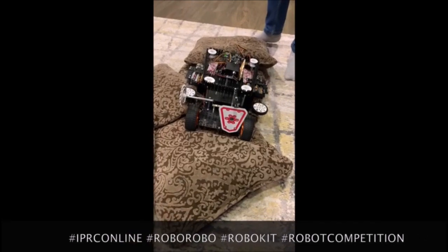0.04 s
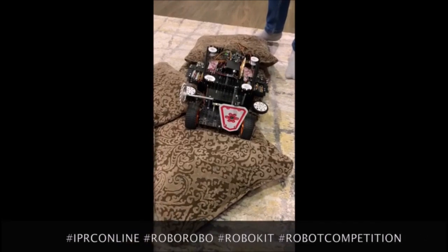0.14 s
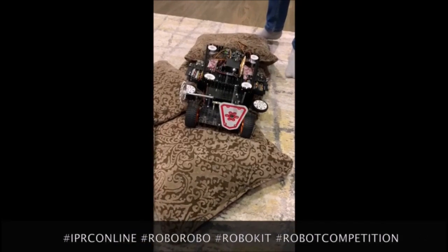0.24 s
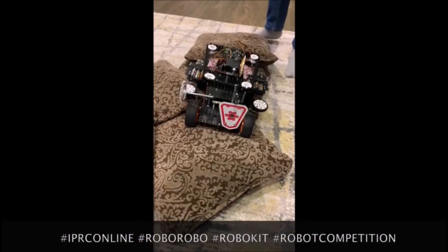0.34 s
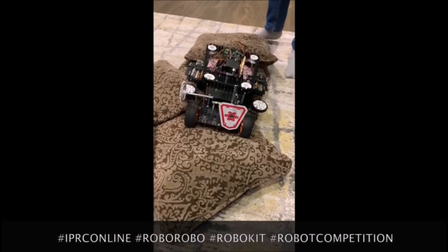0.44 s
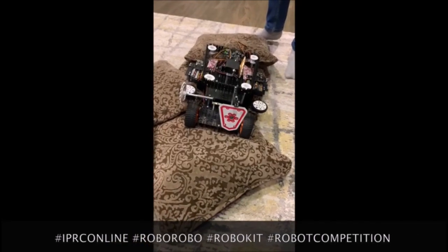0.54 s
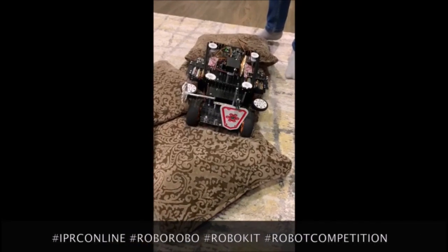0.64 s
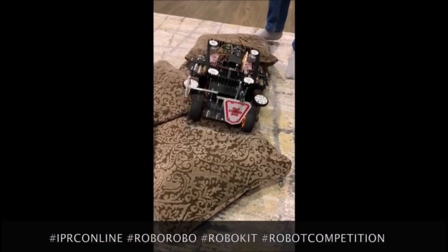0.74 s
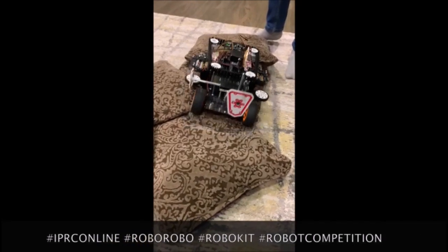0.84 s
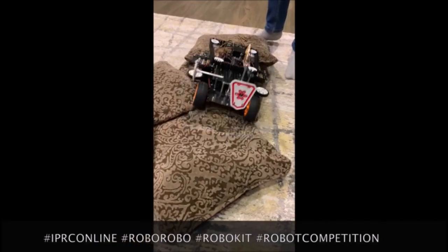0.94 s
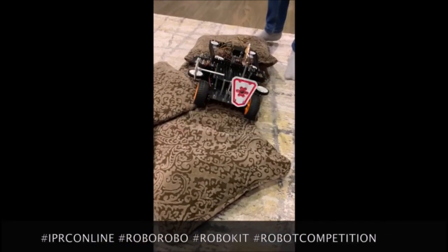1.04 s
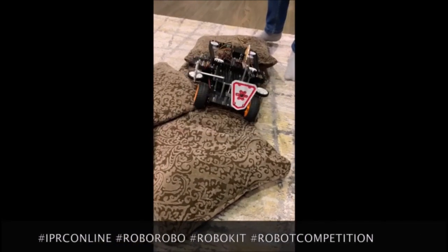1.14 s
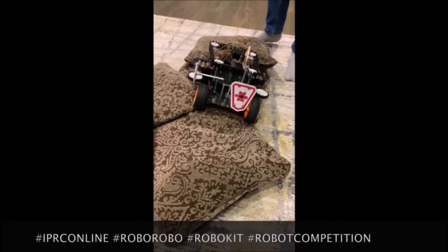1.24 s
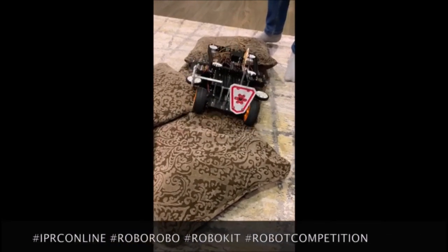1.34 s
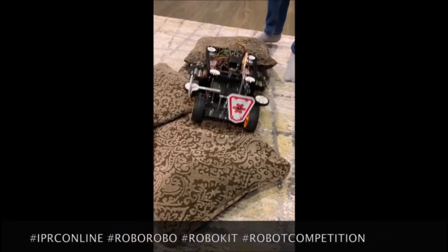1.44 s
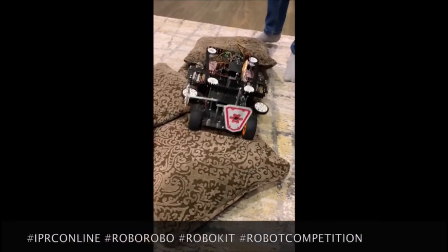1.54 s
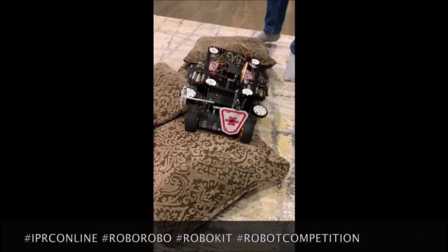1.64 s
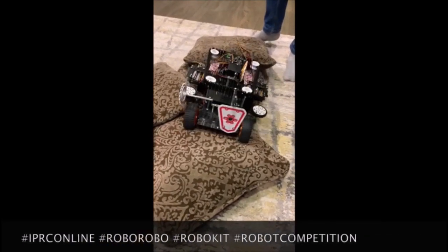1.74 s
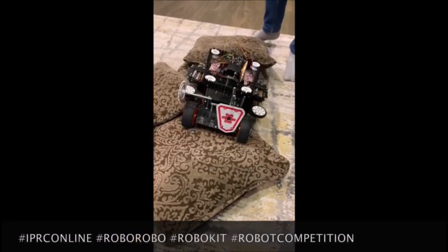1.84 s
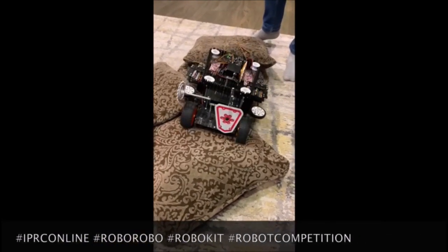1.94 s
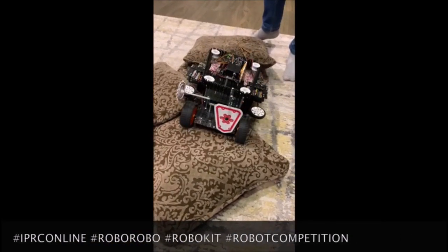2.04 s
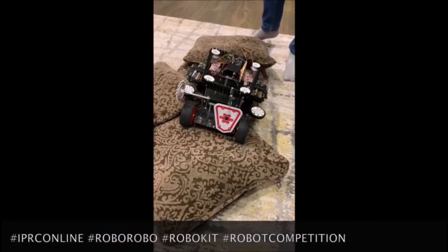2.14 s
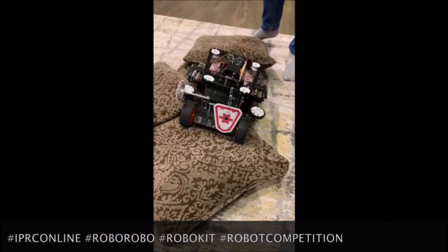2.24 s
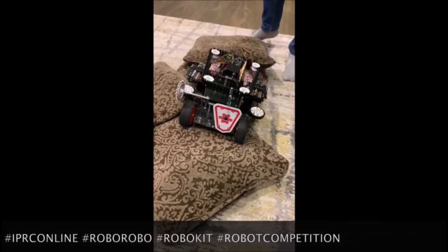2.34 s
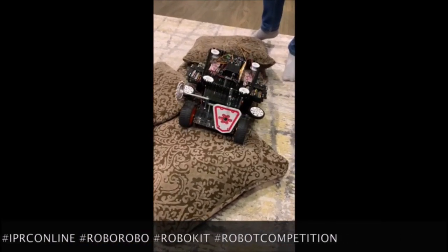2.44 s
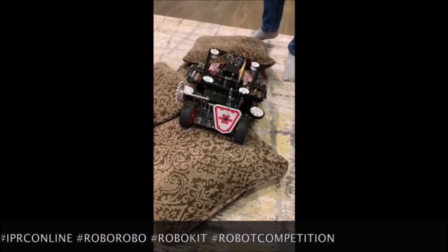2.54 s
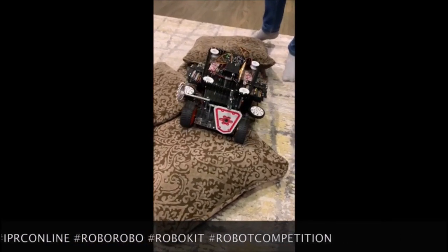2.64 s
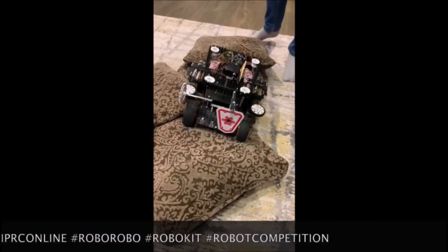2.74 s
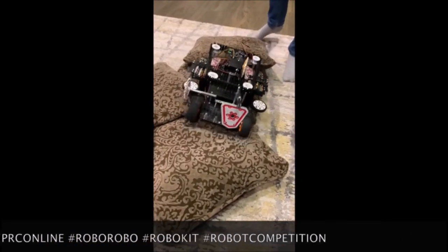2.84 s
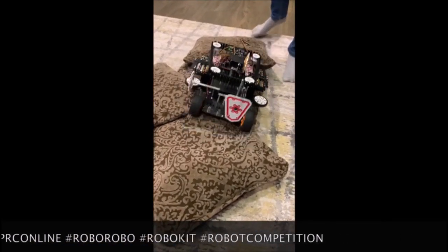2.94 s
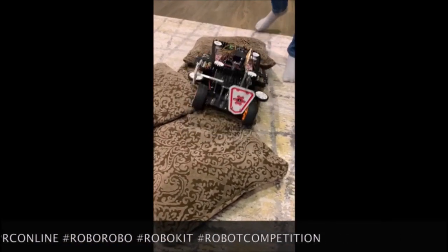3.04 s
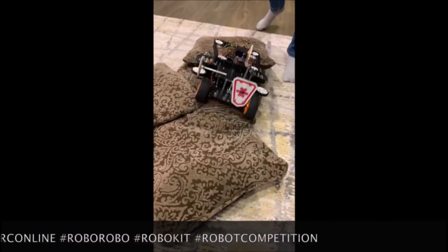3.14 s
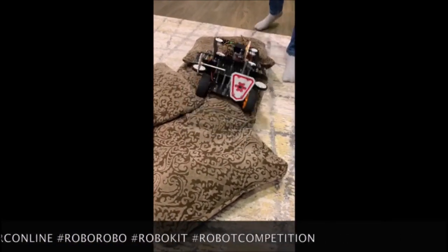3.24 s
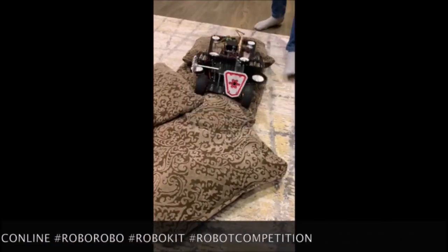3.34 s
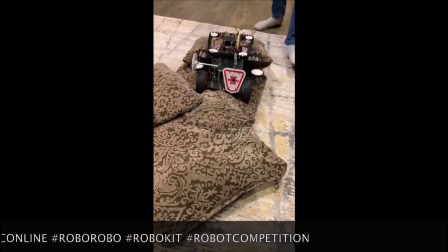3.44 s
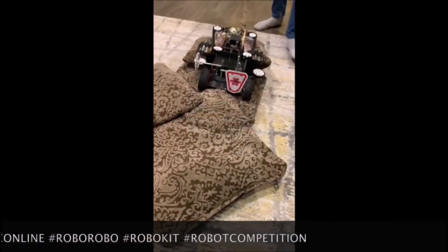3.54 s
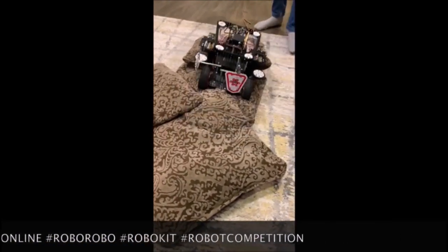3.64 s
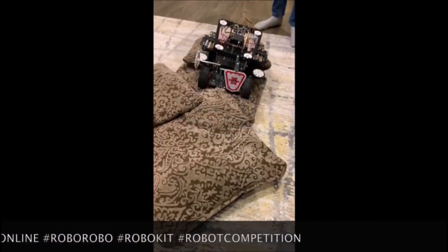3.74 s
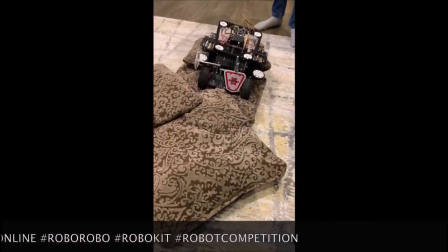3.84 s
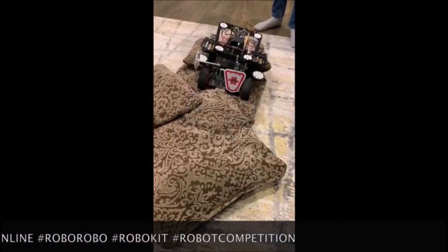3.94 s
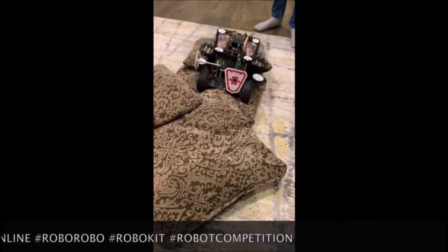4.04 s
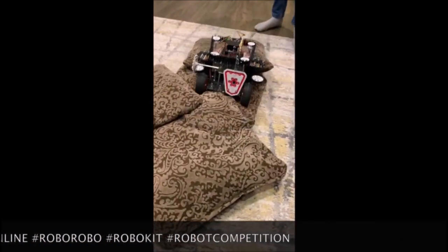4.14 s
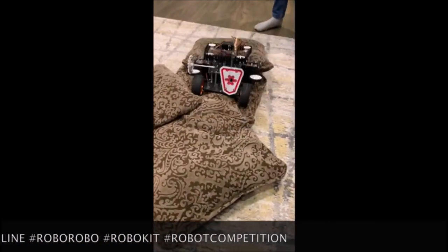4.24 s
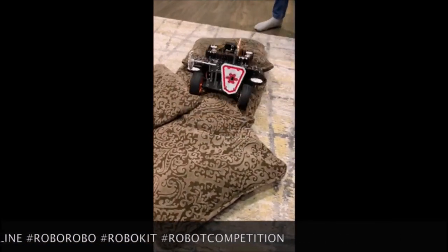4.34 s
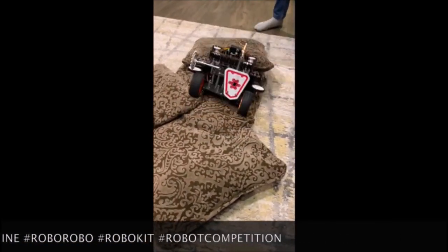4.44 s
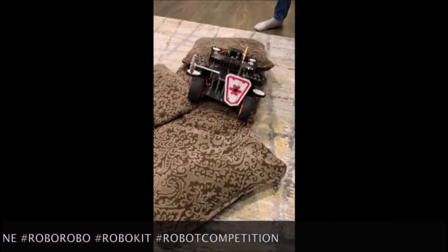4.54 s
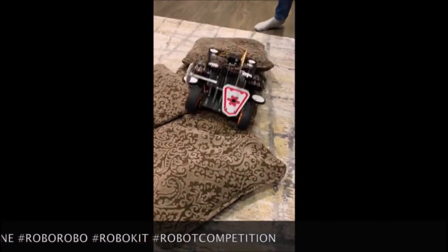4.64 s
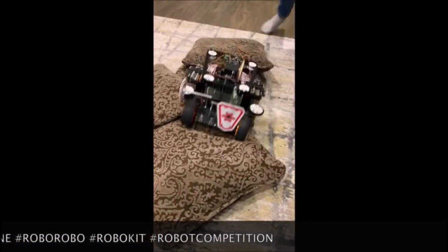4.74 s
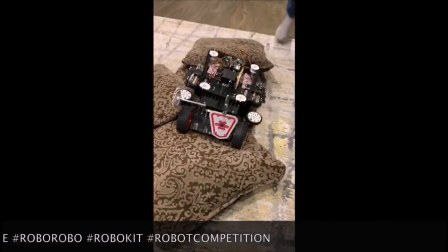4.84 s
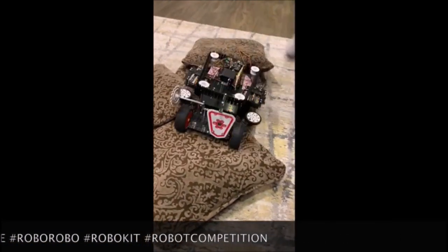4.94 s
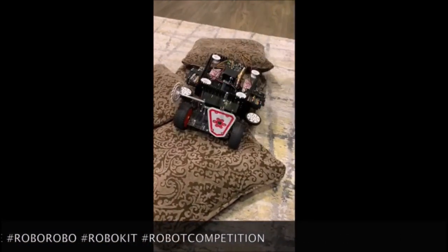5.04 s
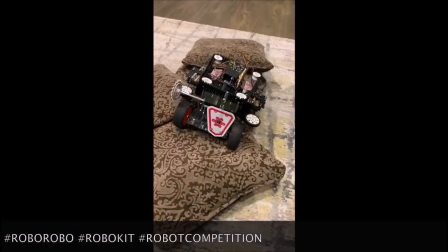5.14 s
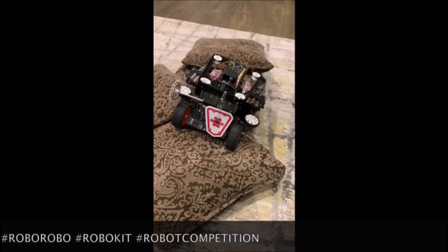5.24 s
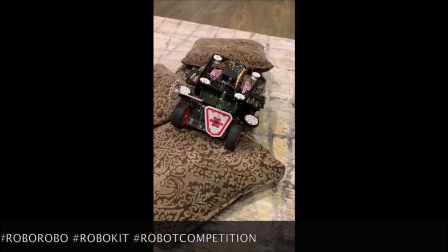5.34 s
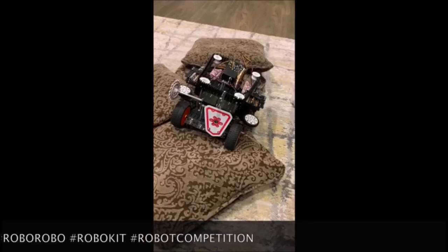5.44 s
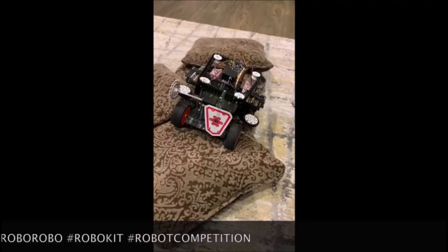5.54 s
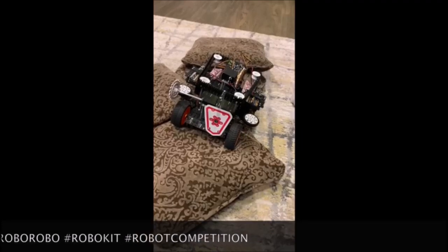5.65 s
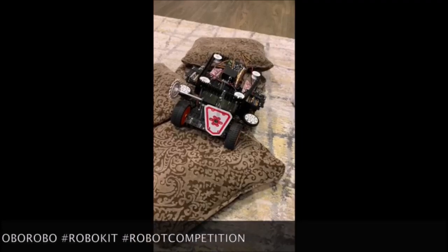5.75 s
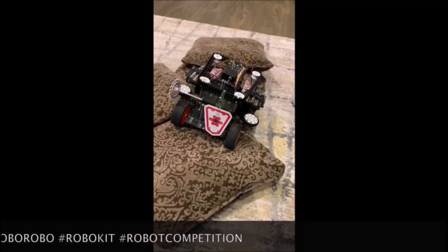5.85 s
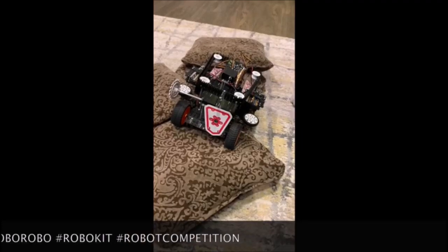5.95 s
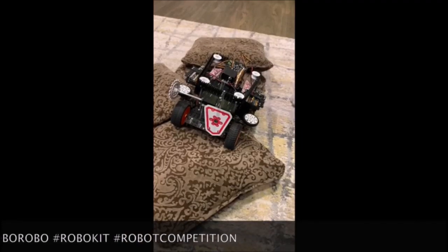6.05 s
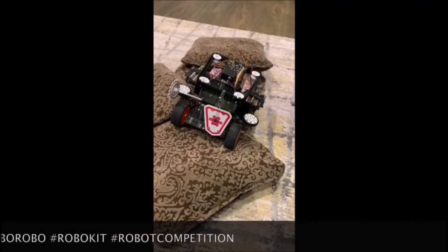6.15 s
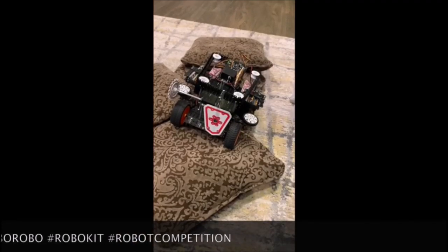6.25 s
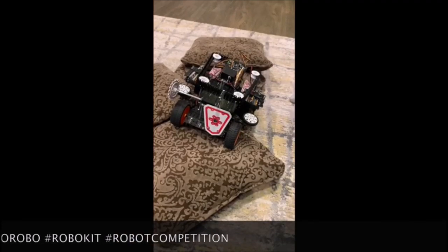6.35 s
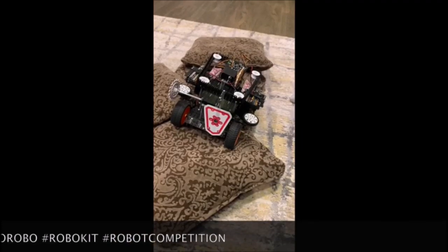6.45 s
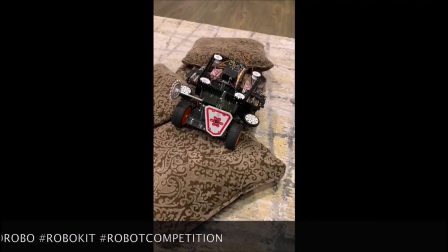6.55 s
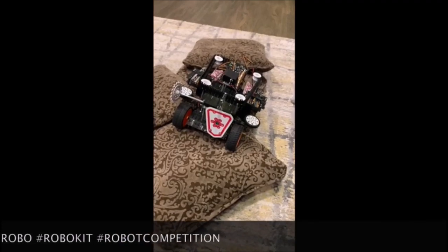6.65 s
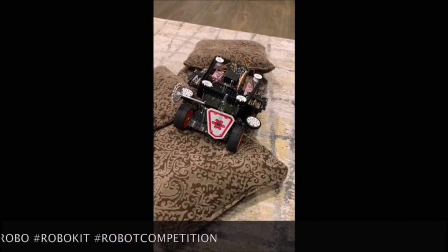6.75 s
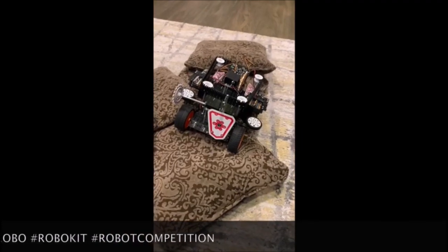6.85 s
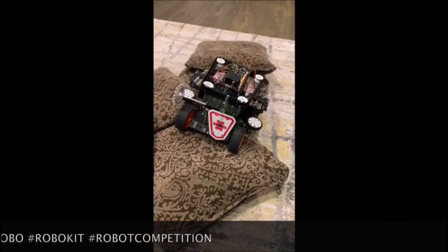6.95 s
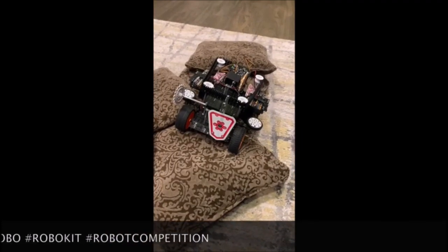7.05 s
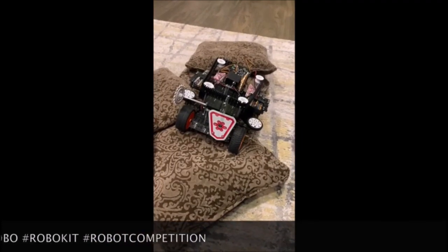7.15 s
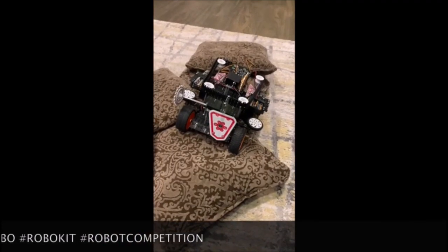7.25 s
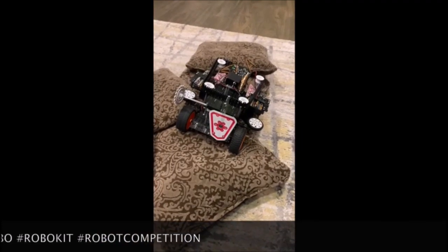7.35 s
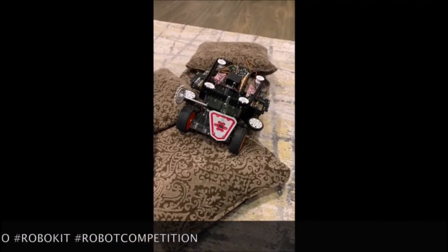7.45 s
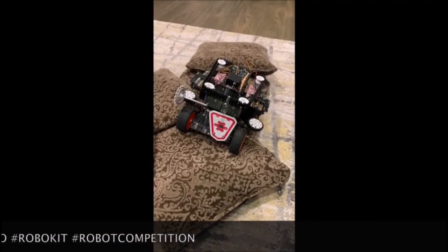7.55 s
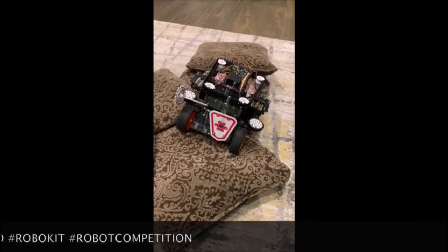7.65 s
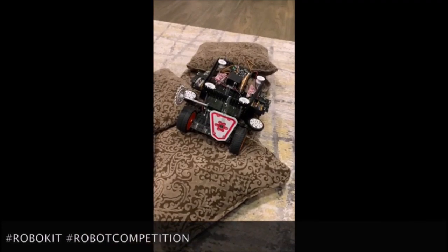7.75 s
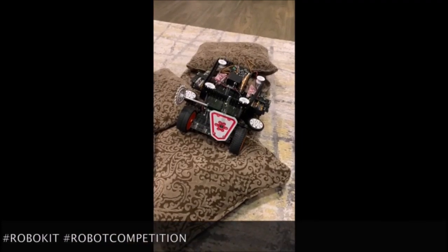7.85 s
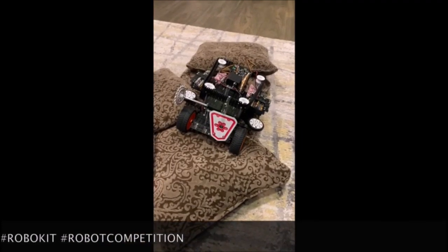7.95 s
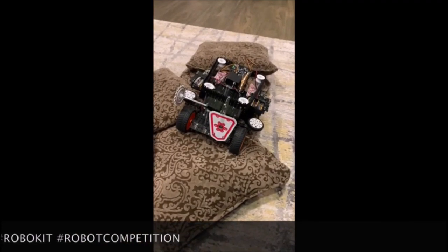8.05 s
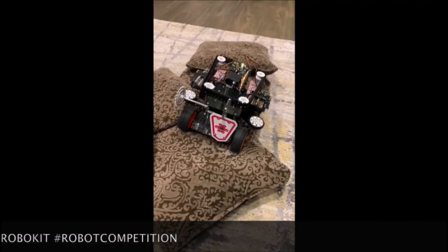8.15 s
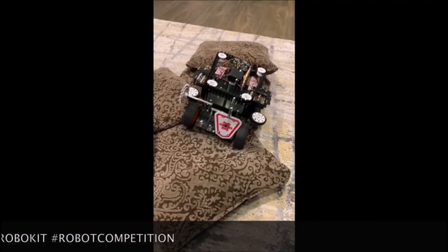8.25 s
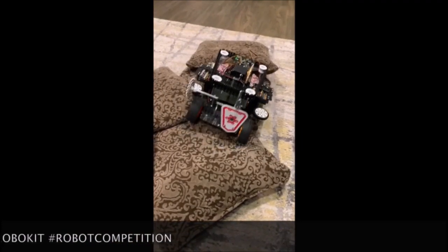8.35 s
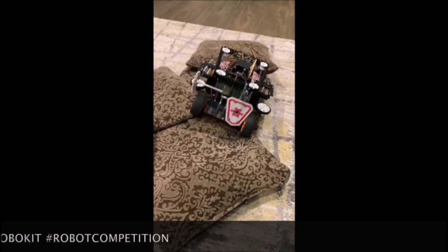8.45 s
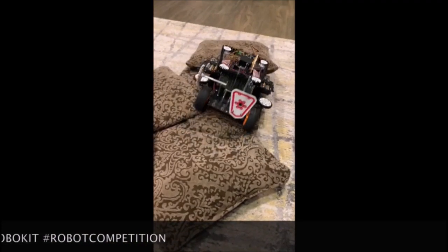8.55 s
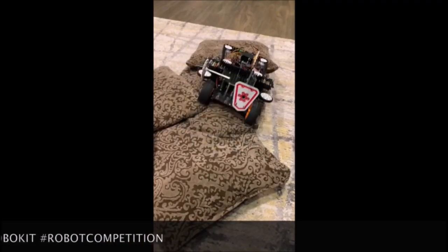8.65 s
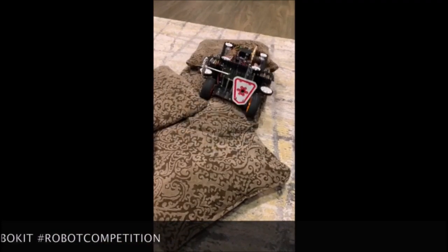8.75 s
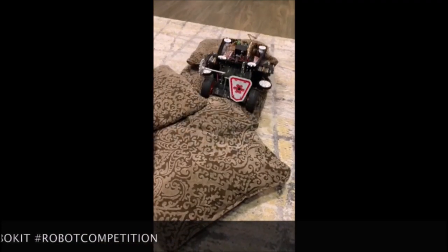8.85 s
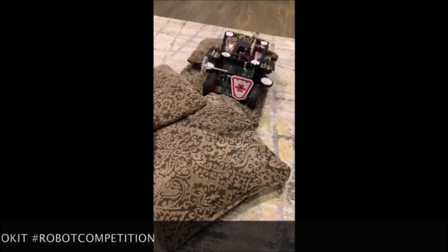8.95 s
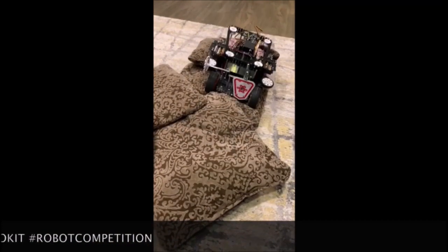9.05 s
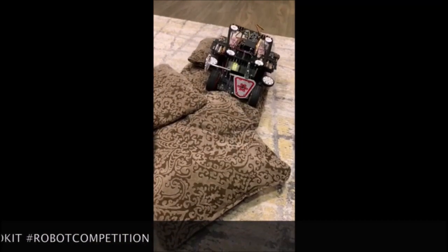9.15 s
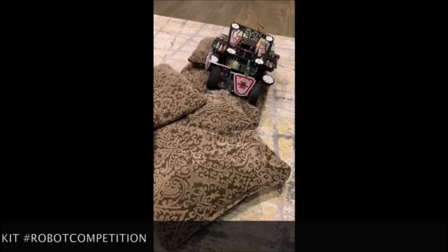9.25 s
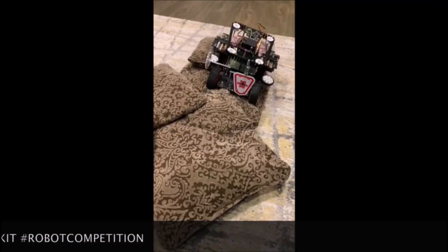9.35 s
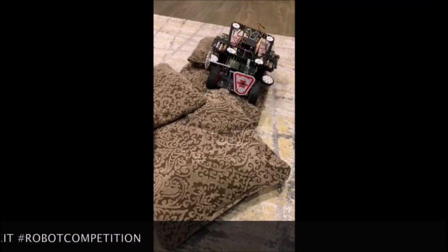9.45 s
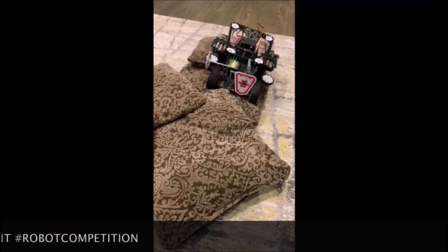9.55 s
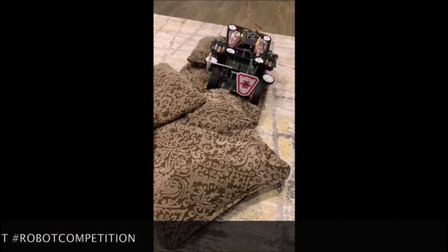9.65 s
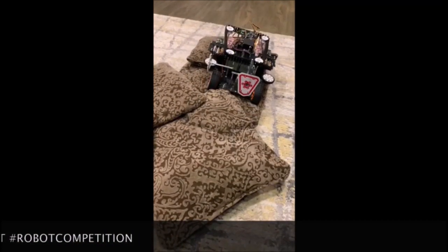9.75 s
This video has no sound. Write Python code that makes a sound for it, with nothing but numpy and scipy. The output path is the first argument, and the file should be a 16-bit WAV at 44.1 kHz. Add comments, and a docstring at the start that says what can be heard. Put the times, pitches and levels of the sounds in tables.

```python
"""A quiet living room, two closely spaced microphones; near reflections mix strongly with the direct sound
in some bands, and the later room echo is faint.
A toy robot on two small gear motors tries again and again to climb a heap of cushions on a rug.
Slack in the gears snaps shut before all runs but the first; tooth strikes rasp through the housings
and a tooth tone with overtones whines, their speed following a curve for each run.
Shaped noise gives soft chassis bumps, tyre rumble, a bystander's feet on the floor, and air over a faint hum."""
import sys
import numpy as np
from scipy import signal
from scipy.fft import rfft, irfft
from scipy.io import wavfile

SR = 44100
rng = np.random.default_rng(int(sys.argv[2]) if len(sys.argv) > 2 else 0)


def wav_out(sig):
    """Save sig, one row per channel (or a flat mono array), as 16-bit PCM at SR to the path in sys.argv[1]."""
    wavfile.write(sys.argv[1], SR, np.round(np.clip(np.atleast_2d(sig).T, -1, 1) * 32767).astype(np.int16))


N = 432180
T = np.arange(N) / SR
HZ = np.fft.rfftfreq(N, 1 / SR)

# motors switched on and off: (start [s], teeth fully engaged [s], time to bite [s], power cut [s],
# creep before the bite [dB], relative whirr [dB], right motor's speed over the left's [ratio],
# right motor's lag [s], relative tyre rumble [dB])
MOTOR_RUNS = [(-0.2, -0.1, 0.05, 0.039, -16, 3, 1.35, 0.02, 6.5),
              (0.44, 0.536, 0.063, 0.82, -25.5, 0.7, 1.18, 0.0049, -2.5),
              (1.157, 1.23, 0.08, 2.347, -15.5, 1.4, 0.98, 0.06, 0),
              (2.545, 2.628, 0.03, 3.67, -19, -1, 1.09, 0.005, -4),
              (3.872, 3.925, 0.07, 7.828, -2, 0.8, 1.1, 0.05, 1),
              (8.024, 8.145, 0.09, 9.28, -14.5, -0.7, 1.03, 0.0093, -2),
              (9.459, 9.551, 0.063, 10.11, -15.5, -2.5, 0.95, 0.011, -6)]
# the climb, one curve for each run:
# (time [s], left motor's tooth-meeting rate [Hz], relative effort [dB], relative whine [dB])
CLIMB_CURVES = [
    [(0, 1400, -41.5, -3)],
    [(0.53, 2058, -37, 4), (0.57, 1924, -35.5, 4.5), (0.61, 1728, -36, 4), (0.69, 1625, -37, 2.5),
     (0.77, 1698, -36, 0.5), (0.82, 1849, -34, -10)],
    [(1.17, 1152, -40.5, 12), (1.22, 1303, -40.5, 2), (1.27, 1718, -38, -5), (1.33, 2253, -39.5, 1),
     (1.38, 2544, -38.5, -5), (1.45, 2706, -36, -13), (1.54, 2305, -32, -6), (1.62, 2075, -37, -3),
     (1.69, 1745, -38, -9), (1.79, 1392, -41, -7), (1.98, 1860, -42, -13), (2.33, 1833, -46, -13)],
    [(2.7, 2396, -35.5, -3), (2.77, 1899, -32.5, 4), (2.82, 1784, -36, 3.5), (2.89, 1802, -34, 2.5),
     (2.98, 2060, -37.5, 3.5), (3.08, 2416, -41.5, -28), (3.23, 1918, -38.5, -14), (3.36, 1847, -32.5, -2),
     (3.48, 1273, -31.5, -9), (3.6, 1381, -43.5, -5)],
    [(3.93, 1246, -44.5, -34), (4.18, 1594, -36.5, -12), (4.35, 1577, -37, -9), (4.55, 1727, -36.5, -7),
     (4.67, 1761, -36, -26), (4.78, 2725, -32, 0), (4.87, 2304, -35, -5), (5.02, 1697, -38.5, -2),
     (5.14, 1451, -40.5, 1.5), (5.3, 1409, -41, -10), (5.5, 1937, -45, -5), (7.8, 2026, -46, -2)],
    [(8.12, 2442, -34, -7), (8.2, 2470, -37, 4), (8.28, 2375, -32.5, 2.5), (8.33, 2117, -34, -7),
     (8.4, 2033, -34, -1), (8.47, 2172, -34.5, -4), (8.54, 2442, -35, -15), (8.63, 2665, -44, -33),
     (8.81, 2047, -34.5, -6), (8.88, 1655, -33, 9), (8.96, 1207, -34, -2), (9.1, 1149, -46, -7),
     (9.24, 1348, -47, -3)],
    [(9.6, 1876, -43.5, -4), (9.7, 1631, -43, -6), (9.75, 1451, -46, 5), (9.8, 1376, -47.5, -1)],
]
# low whirr passed on by the plastic housings: (frequency [Hz], level [dB])
WHIRR_COLOUR = [(100, -30), (200, -21.5), (400, -21.5), (800, -13.5), (1400, -11), (1950, -4.5), (2400, -2),
                (2900, -1), (3400, -3), (4000, -2), (4600, 1), (5400, -0.5), (7000, -29.5)]
# high rasp passed on by the plastic housings: (frequency [Hz], level [dB])
RASP_COLOUR = [(2500, -31), (4300, -41), (5100, -16.5), (5600, -4.5), (6250, 4.5), (6900, 2.5), (7650, -3),
               (8500, 1.5), (9200, 2), (10100, 0.5), (10900, 5.5), (11600, -16), (12100, -46)]
# tooth tone and its overtones: (multiple of the tooth rate [ratio], level [dB])
WHINE_OVERTONES = [(1, -6), (2, -8.5), (3, -11), (4, -14), (5, -15), (6, -17)]
# resonances of the gearbox that the whine sweeps across: (frequency [Hz], level [dB])
GEARBOX_RESONANCE = [(1300, -1), (1950, 0), (2200, -2.5), (2500, 0), (3200, 2.5), (4000, 0.5), (4600, -2),
                     (5300, -1.5), (6400, -0.5), (8000, -5)]
# off-centre gear: (relative effort [dB], swing of loudness [dB])
FLUTTER_DEPTH = [(-45, 1.45), (-37, .7)]
# upper edge of the whirr, changing as the robot moves: (time [s], gain [dB])
UPPER_EDGE = [(0.7, -12), (1.35, -6), (1.8, 12), (2.8, 0.5), (3.3, -19), (4.1, -38), (4.8, 5.5), (5.4, 6),
              (8.3, 4), (9.1, -14)]
# lower edge of the whirr: (time [s], gain [dB])
LOWER_EDGE = [(1.15, -9), (1.4, 4.5), (1.6, 8.5), (1.9, 0.5), (2.9, -1.5), (3.3, 6), (3.8, 2), (4.3, 2.5),
              (5.1, 5), (5.6, 2.5), (9.1, -0.5)]
# slack snapping shut: (time [s], relative level [dB])
SLACK_SNAPS = [(0.298, -65), (0.3834, -47), (1.0751, -46.5), (2.4727, -49.5), (3.7744, -46.5), (7.969, -49),
               (9.369, -47)]
# sound of a snap: (frequency [Hz], level [dB])
SNAP_SPECTRUM = [(300, -57), (1200, -34), (2200, -12), (3200, -9), (4200, -1), (5400, 8.5), (6500, -4),
                 (7800, -4.5), (9200, -11), (10800, -5.5), (12500, -11)]
# chassis landing on the cushions: (time [s], level [dB], time to fall 60 dB [s])
CHASSIS_BUMPS = [(3.185, -54.5, 0.37), (3.279, -46.5, 0.25), (3.325, -56, 0.21), (3.375, -52, 0.42),
                 (3.485, -47, 0.12), (4.02, -58.5, 1), (4.249, -54.5, 0.45), (4.72, -56, 0.21),
                 (4.828, -47, 0.26), (4.93, -56.5, 0.39), (8.68, -55.5, 0.57), (8.789, -50, 0.24),
                 (9.068, -47, 0.19), (9.125, -52, 0.25)]
# sound of a bump: (frequency [Hz], level [dB])
BUMP_SPECTRUM = [(25, -13), (70, -5.5), (170, -1), (260, -2), (400, -14), (800, -17), (2000, -19.5),
                 (5000, -67)]
# tyres on cloth: (frequency [Hz], level [dB])
TYRE_SPECTRUM = [(20, -41), (45, -6.5), (70, 3.5), (110, -4.5), (160, 2.5), (270, -6), (450, -11.5),
                 (1000, -18), (3000, -34)]
# feet shifting on the floor: (time [s], level [dB])
FEET_LEVEL = [(3.1, -101), (3.6, -66.5), (4.05, -71), (4.5, -79), (5.3, -67), (5.6, -99)]
# sound of the floor: (frequency [Hz], level [dB])
FLOOR_SPECTRUM = [(20, -22), (45, 7), (80, 10), (130, -22), (400, -36), (2000, -77)]
# air of the still room: (frequency [Hz], level [dB])
AIR_SPECTRUM = [(20, -10), (45, 0), (80, -11), (130, -15), (300, -1.5), (500, -2), (850, -17), (1200, -8.5),
                (1650, -5), (2200, -16), (4000, -58), (6000, -8), (11000, -65.5)]
# hum of the room: (frequency [Hz], level [dB])
HUM_TONES = [(82, -79.5), (164, -87.5), (247, -88)]
# microphone pair, phase: (frequency [Hz], lead of left over right [rad])
LEFT_LEAD = [(2000, 0), (2550, -1), (3000, -2.7), (3700, -3.6), (4450, -4.3), (4950, -3.2), (5600, -3.1),
             (6200, -1.9), (6800, -1.05), (7400, 0), (9500, 0), (10400, 1.4), (11300, 3.1)]
# microphone pair, shared part of the sound: (frequency [Hz], likeness [0-1])
PAIR_LIKENESS = [(120, .92), (600, .45), (1300, .78), (2000, .8), (2600, .45), (4000, .45), (5200, .98),
                 (6000, .72), (6900, .72), (7600, .98), (9300, .98), (10100, .5), (10900, .7),
                 (11400, .995)]
# microphone pair, level: (frequency [Hz], left minus right [dB])
PAIR_BALANCE = [(50, 0.5), (220, -4), (700, 0), (2000, -0.5), (3400, -2.5), (4800, 0)]

EASY_DB, EASY_HZ = -37, 2000  # effort and tooth rate at easy running
# whirr: base level, dB per dB of effort, dB per doubling of speed, level between runs
WHIRR_DB, WHIRR_PER_DB, WHIRR_PER_OCTAVE_DB, IDLE_DB = -50, 0.68, 2.5, -75.5
# every start: the gears creep round, then bite and spin up from a share of their speed
CREEP_RISE_S, SPIN_UP_S, START_SHARE = 0.028, 0.04, 0.6
# every stop: the rasp falls fast to a tail, the gearbox coasts longer
RASP_FALL_DB_PER_S, RASP_TAIL_DB, COAST_DB_PER_S = 443, -10, 221
TEETH_PER_TURN = 59
TOOTH_LIKENESS = 0.26  # share of each tooth's scrape repeated by the next
SPEED_WAVER, WHINE_SMEAR = 0.006, 0.55  # unsteady speed, whine smeared by loose teeth [share]
WHINE_DIRECT = 0.7  # least likeness of the whine at the two microphones
UPPER_HZ, UPPER_WIDTH_HZ = 4550, 370
LOWER_HZ, LOWER_WIDTH_HZ = 1130, 240
EDGE_HZ = 12200


def amp(db):
    """Decibels to gain."""
    return np.exp(np.asarray(db) * np.log(10) / 20)


def evened(x):
    """Scales to unit power."""
    return x / np.sqrt(np.mean(x ** 2) + 1e-20)


def read(points):
    """A table over frequency, joined on a log axis."""
    f, value = np.transpose(points)
    return np.interp(np.log(HZ + 1), np.log(f + 1), value)


def curve(rows, axis=1):
    """One column of a table over time."""
    rows = np.array(rows)
    return np.interp(T, rows[:, 0], rows[:, axis])


def per_run(axis):
    """One column of the motor runs, held from each start to the next."""
    rows = np.array(MOTOR_RUNS)
    run = np.maximum(np.searchsorted(rows[:, 0], T) - 1, 0)
    return rows[run, axis]


def ramp(start, length):
    """Rises from 0 to 1."""
    return np.clip((T - start) / length, 0, 1)


def colour(x, points):
    """Filters x by a spectrum, leaving the power of white noise unchanged."""
    return irfft(rfft(x) * evened(amp(read(points))), N)


def noise(points):
    """Noise with a given spectrum, of about unit power."""
    return colour(rng.standard_normal(N), points)


def wander(hz):
    """Slow chance of unit power, rolling off above about hz."""
    slow_hz = HZ[HZ < 1500]
    spectrum = rng.standard_normal(len(slow_hz)) + 1j * rng.standard_normal(len(slow_hz))
    return evened(irfft(spectrum / (1 + (slow_hz / hz) ** 4), N))


def swell(x, levels, hz, width_hz):
    """What one band of x gains or loses as it follows a level curve."""
    band = irfft(rfft(x) * np.exp(-((HZ - hz) / width_hz) ** 2), N)
    return (amp(curve(levels)) - 1) * band


def echoes(t60, delay):
    """Frequency response of a dying cloud of sparse reflections, energy 1."""
    t = T[:SR // 2]
    sparse = rng.random(len(t)) < 1 / 8
    taps = rng.standard_normal(len(t)) * sparse * amp(-60 * t / t60) * (t > delay)
    return rfft(taps / np.linalg.norm(taps), N)


def drifting_echoes(spectrum, t60, delay, count=5):
    """Reflections keep changing as the robot rocks about: several clouds fade in and out."""
    total = 0
    for hz in np.geomspace(1.3, 9, count):
        fade = np.cos(2 * np.pi * (hz * T + rng.random()))
        total = total + irfft(spectrum * echoes(t60, delay), N) * fade
    return total * np.sqrt(2 / count)


def drive():
    """Gears creep, bite, spin up and coast: speed, effort, whine level and gains of rasp and whirr."""
    speed, effort_db, whine_db = np.full(N, 1. * EASY_HZ), np.full(N, 1. * EASY_DB), np.zeros(N)
    rasp, whirr = 0, amp(IDLE_DB)
    for run, climb in zip(MOTOR_RUNS, CLIMB_CURVES):
        start, engaged, bite_s, cut, creep_db, whirr_db = run[:6]
        bite = engaged - bite_s
        since_cut = np.maximum(T - cut, 0)

        spin_up = 1 - (1 - START_SHARE) * np.exp(-np.maximum(T - bite, 0) / SPIN_UP_S)
        hz = curve(climb, axis=1) * spin_up
        db = curve(climb, axis=2)

        creep = amp(creep_db) * ramp(start, CREEP_RISE_S)
        attack = np.maximum(creep, ramp(bite, bite_s) ** 2)
        coast = amp(-COAST_DB_PER_S * since_cut)
        rasp_fall = np.maximum(amp(-RASP_FALL_DB_PER_S * since_cut), amp(RASP_TAIL_DB) * coast)
        rasp = rasp + amp(db) * attack * rasp_fall

        # the whirr grows with effort and speed
        level_db = WHIRR_DB + whirr_db + WHIRR_PER_DB * (db - EASY_DB)
        level_db = level_db + WHIRR_PER_OCTAVE_DB * np.log2(hz / EASY_HZ)
        whirr = np.hypot(whirr, amp(level_db) * np.sqrt(attack) * coast)

        speed = np.where(T > start, hz, speed)
        effort_db = np.where(T > start, db, effort_db)
        whine_db = np.where(T > start, curve(climb, axis=3), whine_db)
    return speed, effort_db, whine_db, rasp, whirr


def right_speed(speed):
    """The right motor follows the left a little later, at a speed ratio set for each run."""
    return per_run(axis=6) * np.interp(T - per_run(axis=7), T, speed)


def motor(speed, uneven_db=4.0, lurch_db=1.18, scrape=0.86):
    """Each tooth strikes and scrapes partly like the last, so the rasp gathers in bands moving with speed."""
    mesh_hz = speed * (1 + SPEED_WAVER * wander(45))
    teeth = np.cumsum(mesh_hz) / SR
    force = amp(uneven_db * np.clip(rng.standard_normal(N), -2, 2)) * rng.choice([-1, 1], N)
    strikes = np.diff(np.floor(teeth), prepend=0) * force
    rasp = evened(strikes) + scrape * rng.standard_normal(N)
    one_tooth_ago = np.interp(T - 1 / mesh_hz, T, rasp)
    rasp = evened(rasp + TOOTH_LIKENESS * one_tooth_ago)

    # a slow, loaded motor has strong overtones; a fast one sings on its fundamental
    load = 1 / (1 + (speed / 2300) ** 14)
    whine = 0
    for k, db in WHINE_OVERTONES:
        balance = 1 - 0.68 * load if k == 1 else 0.25 + 0.75 * load
        smear = 1 + WHINE_SMEAR * wander(60 + 22 * k)
        whine = whine + amp(db) * balance * np.cos(2 * np.pi * k * teeth) * smear
    return np.array([rasp, whine]) * amp(lurch_db * wander(59))


def flutter(speed, effort_db):
    """An off-centre gear presses harder once a turn, never twice alike; it stands out at low effort."""
    turns = np.cumsum(speed * (1 + 0.025 * wander(6))) / SR / TEETH_PER_TURN
    turn = 2 * np.pi * turns
    press = np.cos(turn) + 0.4 * np.cos(2 * turn) + 0.35 * np.cos(3 * turn) + 0.3 * np.cos(4 * turn)
    depth_db = np.interp(effort_db, *np.transpose(FLUTTER_DEPTH))
    return amp(depth_db * evened(press) * (1 + 0.25 * wander(12)))


def gearboxes(speed, effort_db, whine_db, rasp, whirr, rasp_db=-1.68, right_db=-5, right_whine_db=-2):
    """Both gear trains sound through their housings, as grinding and whine; rasp flutters more than whirr."""
    left = motor(speed)
    right = amp(right_db) * motor(right_speed(speed))
    grinding = left[0] + right[0]

    # the whine fades out with the whirr; its overtones sing out at the gearbox resonances
    powered = np.clip((20 * np.log10(whirr) + 65) / 12, 0, 1)
    whine = powered * amp(whine_db) * (left[1] + amp(right_whine_db) * right[1])
    whine = irfft(rfft(whine) * amp(read(GEARBOX_RESONANCE)), N)

    gears = np.array([grinding, whine]) / np.std(grinding)
    press = flutter(speed, effort_db)
    housing = colour(gears, WHIRR_COLOUR)
    housing = housing + swell(housing, UPPER_EDGE, UPPER_HZ, UPPER_WIDTH_HZ) \
        + swell(housing, LOWER_EDGE, LOWER_HZ, LOWER_WIDTH_HZ)
    rasping = amp(rasp_db) * rasp * press * colour(gears, RASP_COLOUR)
    return rasping + whirr * np.sqrt(press) * housing


def snaps(level_db=20, rattle_db=-8, rattle_t60=0.32):
    """Tooth knocks on tooth, with a short clatter through the frame and a faint rattle of loose gears."""
    knocks = np.zeros(N)
    for s, db in SLACK_SNAPS:
        knocks[round(s * SR)] += amp(db + level_db)
    clatter = irfft(rfft(knocks) * echoes(t60=0.018, delay=0.001), N)
    rattle = irfft(rfft(knocks) * echoes(rattle_t60, delay=0.008), N)
    return colour(knocks + clatter, SNAP_SPECTRUM) + amp(rattle_db) * colour(rattle, RASP_COLOUR)


def cushions(whirr, rolling_db=-42, rise_s=0.015, lumpy_db=0.9):
    """Dull puffs where the chassis lands, over the lumpy rumble of tyres on cloth."""
    blows = 0
    for s, db, t60 in CHASSIS_BUMPS:
        blows = blows + amp(db - 60 * np.maximum(T - s, 0) / t60) * ramp(s, rise_s)
    rolling = np.sqrt(whirr) * amp(rolling_db + per_run(axis=8) + lumpy_db * wander(19))
    return blows * noise(BUMP_SPECTRUM) + rolling * noise(TYRE_SPECTRUM)


def floorboards():
    """The floor rumbles faintly as a bystander shifts their feet."""
    return amp(curve(FEET_LEVEL)) * noise(FLOOR_SPECTRUM)


def still_room(air_db=-78, drift_rad=0.91):
    """Faint air noise and a hum whose phase wavers."""
    hum = 0
    for hz, db in HUM_TONES:
        phase = 2 * np.pi * hz * T + drift_rad * wander(7.4)
        hum = hum + amp(db) * np.sqrt(2) * np.sin(phase)
    return amp(air_db) * noise(AIR_SPECTRUM) + hum


def microphones(x, whine, near_t60=0.032, room_t60=0.14, room_db=-13):
    """Direct sound arrives out of step, near reflections differ at each port; the whine is mostly direct."""
    alike = np.clip(read(PAIR_LIKENESS), 0, 1)
    whine_alike = WHINE_DIRECT + (1 - WHINE_DIRECT) * alike
    room = drifting_echoes(rfft(x + whine), room_t60, delay=0.008, count=3)
    heard = rfft(x + amp(room_db) * room)
    tone = rfft(whine)
    direct = heard * np.sqrt(alike) + tone * np.sqrt(whine_alike)
    scattered = heard * np.sqrt(1 - alike) + tone * np.sqrt(1 - whine_alike)
    ports = []
    for side in (1, -1):  # left, right
        gain = amp(side * read(PAIR_BALANCE) / 2)
        shift = np.exp(side * 1j * read(LEFT_LEAD) / 2)
        near = drifting_echoes(gain * scattered, near_t60, delay=0.001)
        ports.append(irfft(gain * direct * shift, N) + near)
    return np.array(ports)


def scene():
    """The robot and the room at the two microphones."""
    speed, effort_db, whine_db, rasp, whirr = drive()
    grinding, whine = gearboxes(speed, effort_db, whine_db, rasp, whirr)
    sources = grinding + snaps() + cushions(whirr) + floorboards() + still_room()
    return microphones(sources, whine)


def record(dry):
    """A steep low-pass sets the upper band limit."""
    low_pass = signal.firwin(255, EDGE_HZ, window=("kaiser", 8), fs=SR)
    return signal.oaconvolve(dry, low_pass[None], "same")


dry = scene()
out = record(dry)
wav_out(out)
```